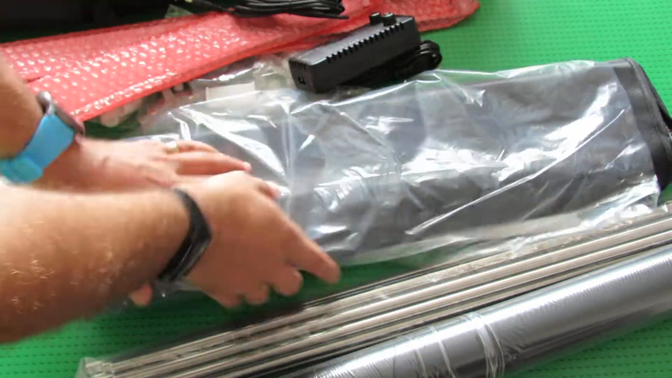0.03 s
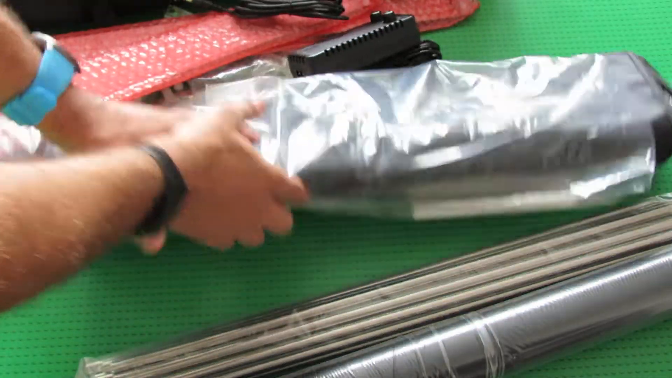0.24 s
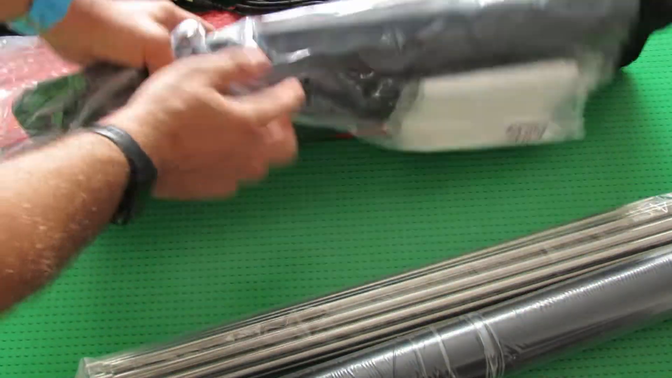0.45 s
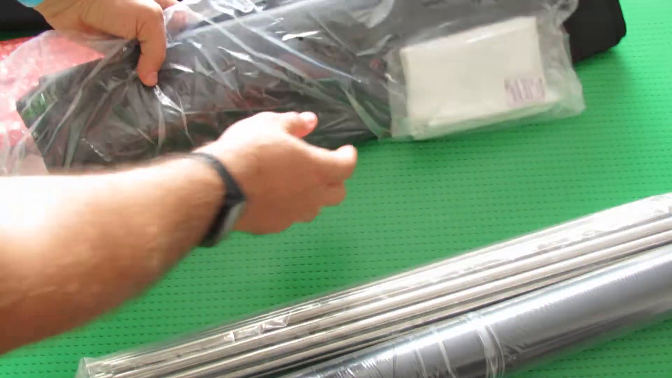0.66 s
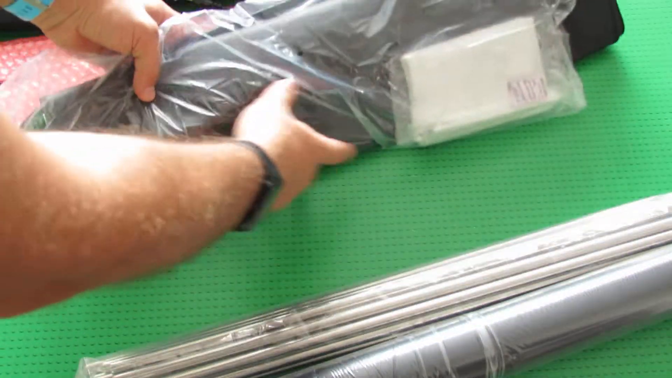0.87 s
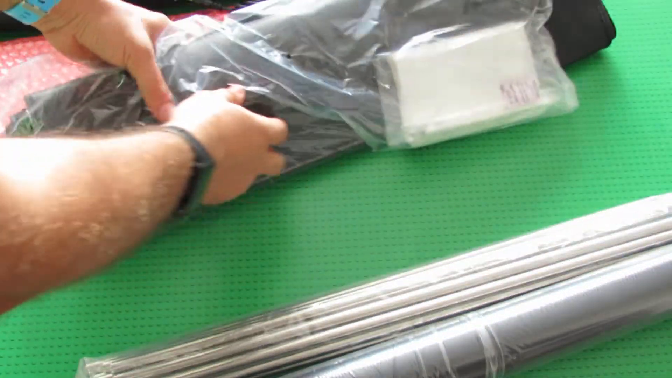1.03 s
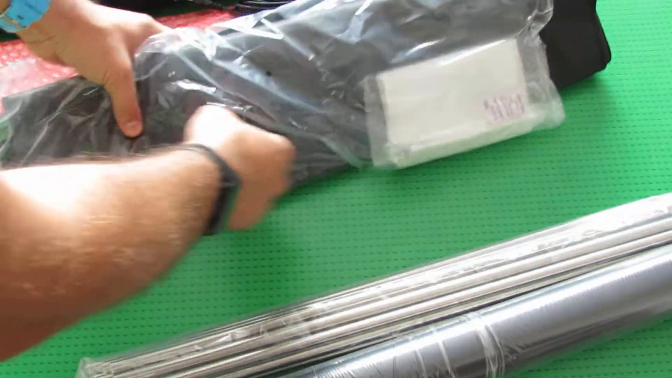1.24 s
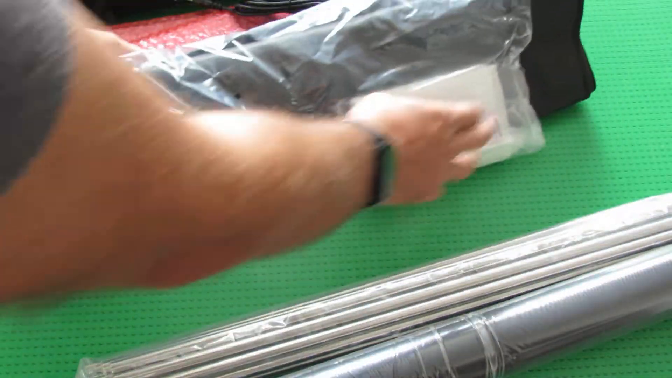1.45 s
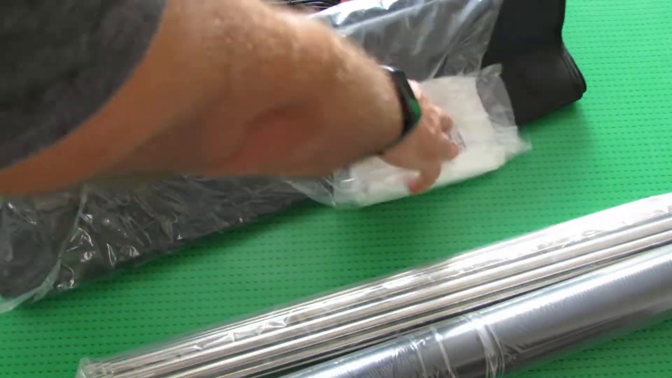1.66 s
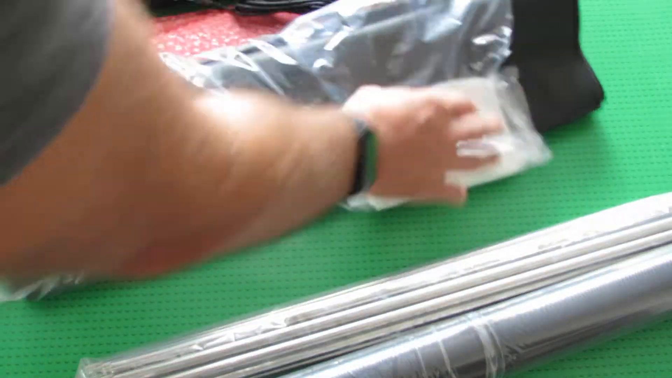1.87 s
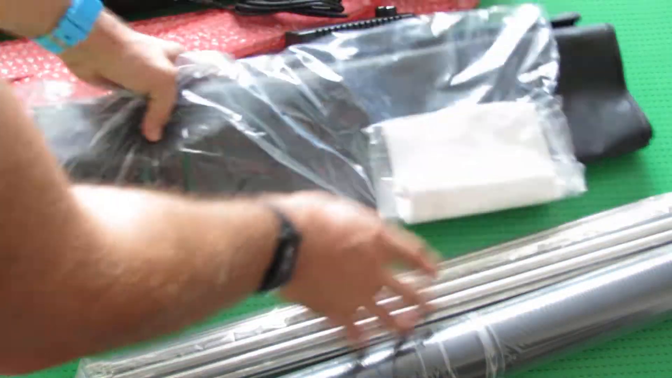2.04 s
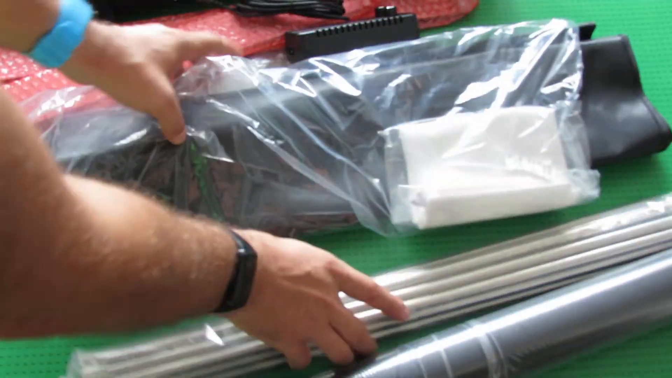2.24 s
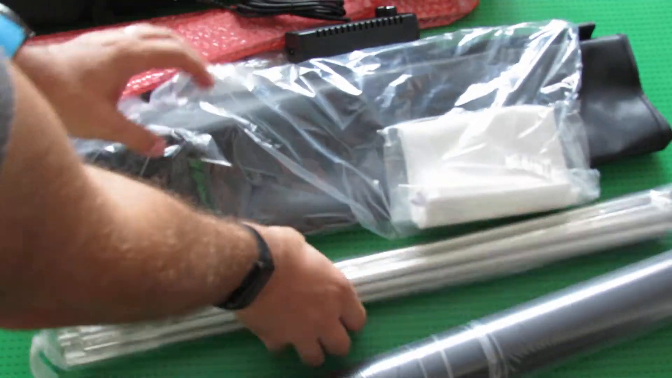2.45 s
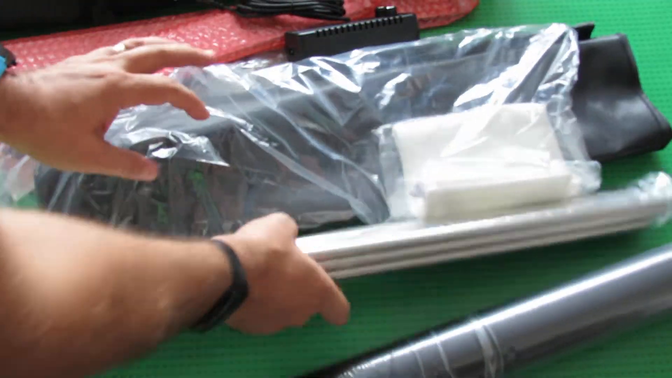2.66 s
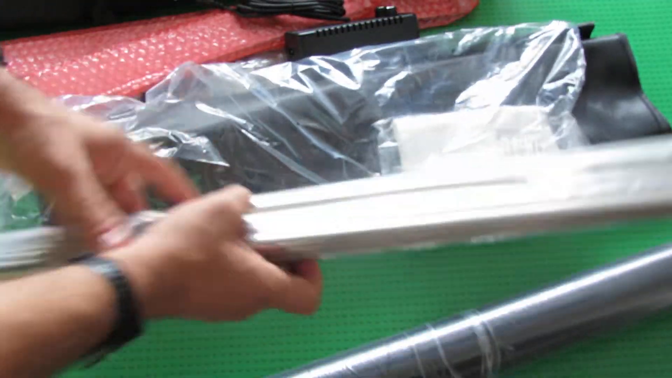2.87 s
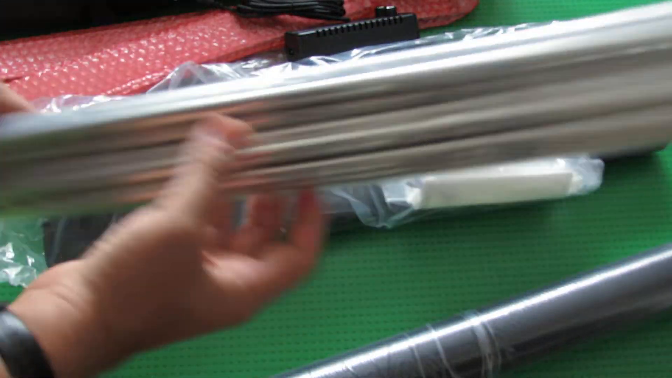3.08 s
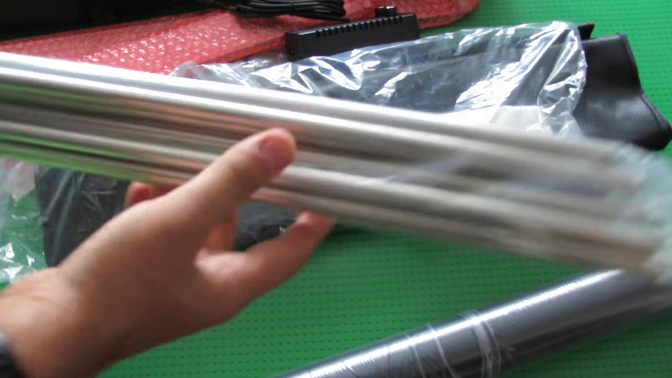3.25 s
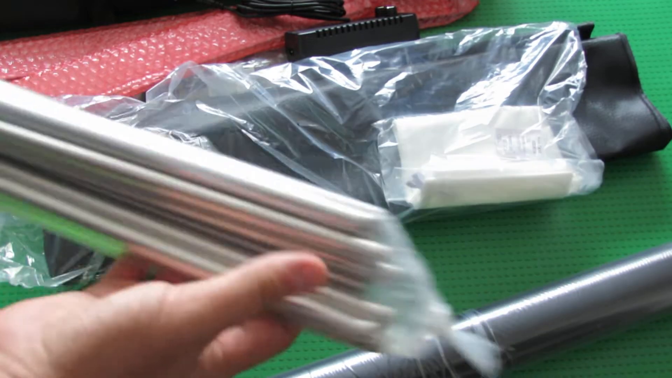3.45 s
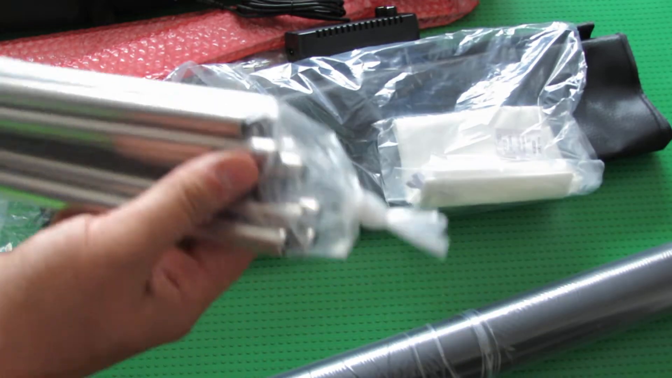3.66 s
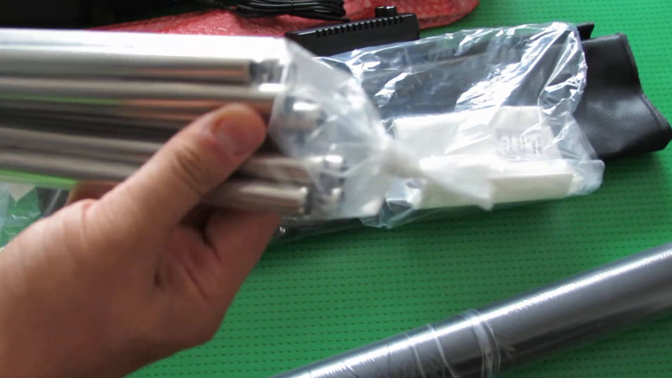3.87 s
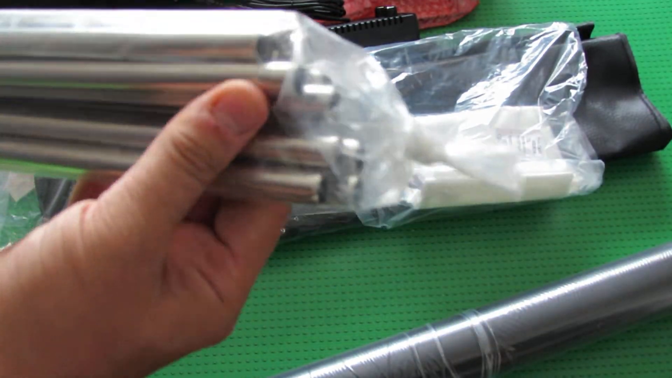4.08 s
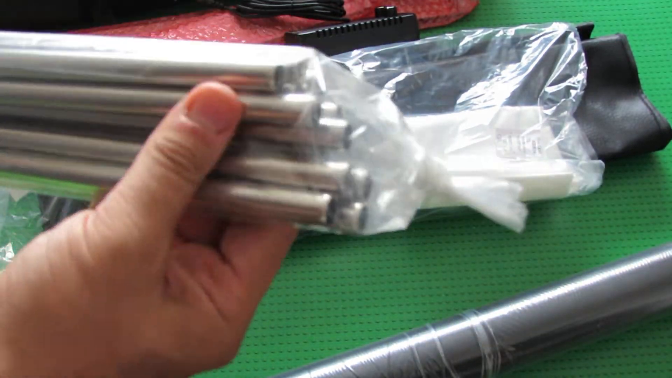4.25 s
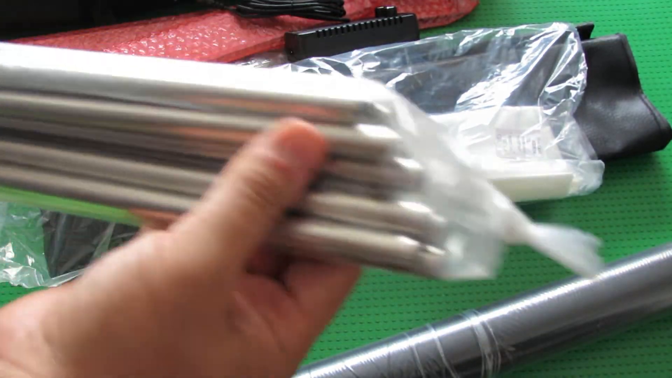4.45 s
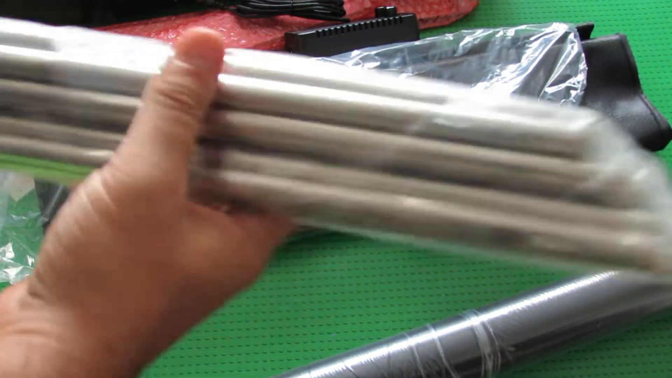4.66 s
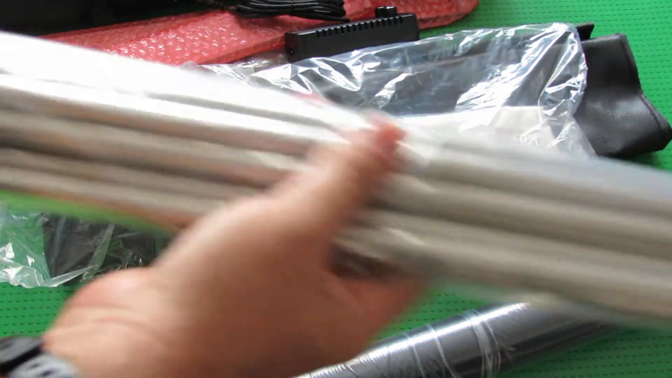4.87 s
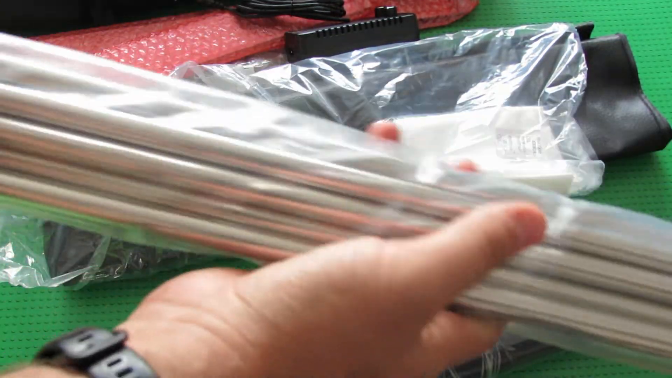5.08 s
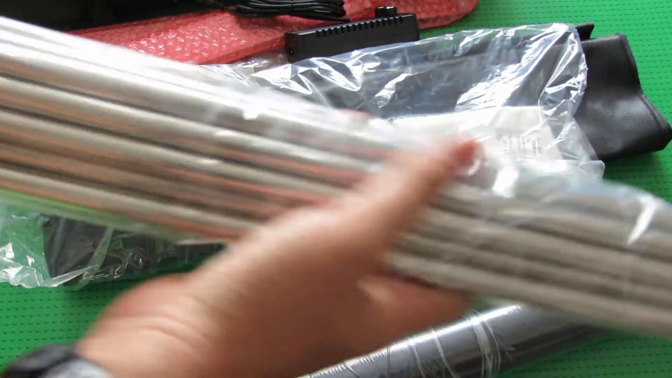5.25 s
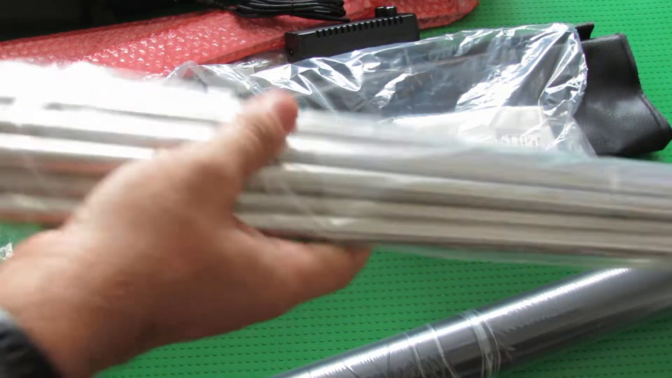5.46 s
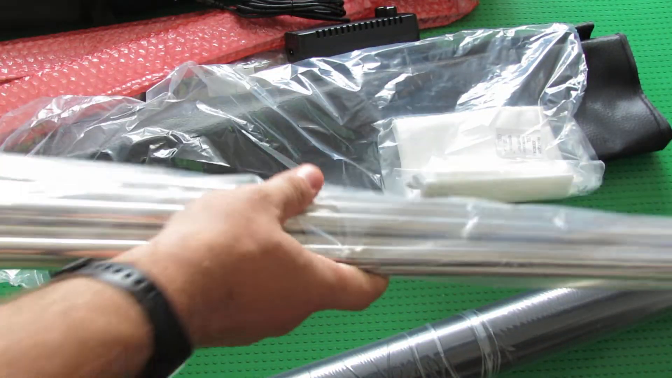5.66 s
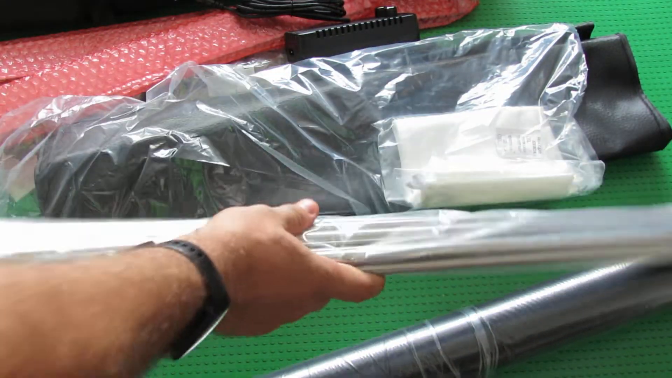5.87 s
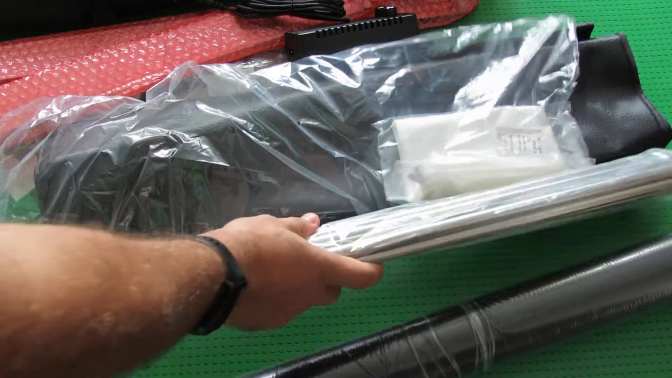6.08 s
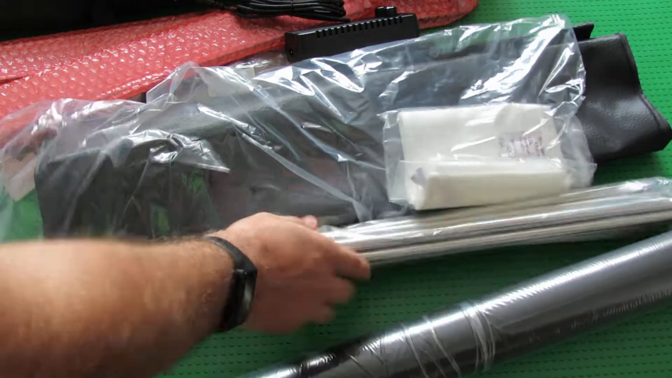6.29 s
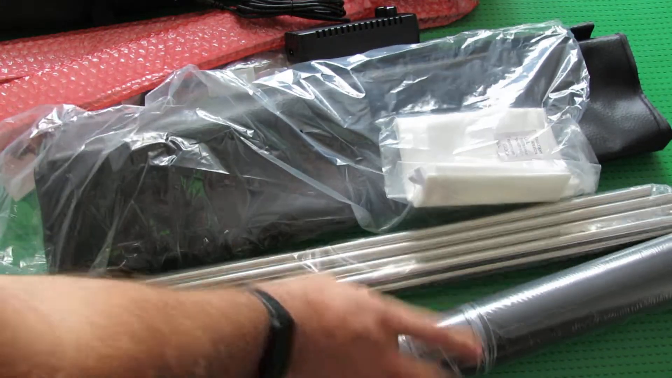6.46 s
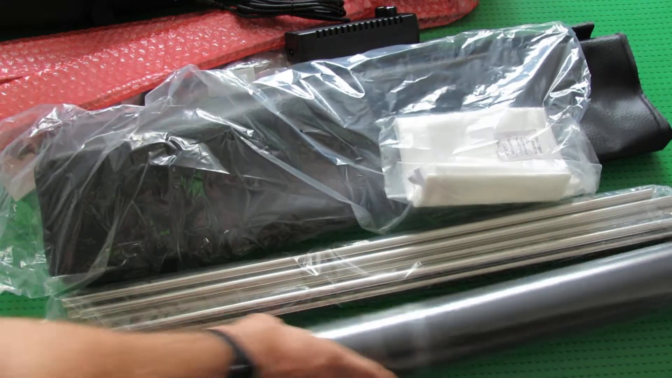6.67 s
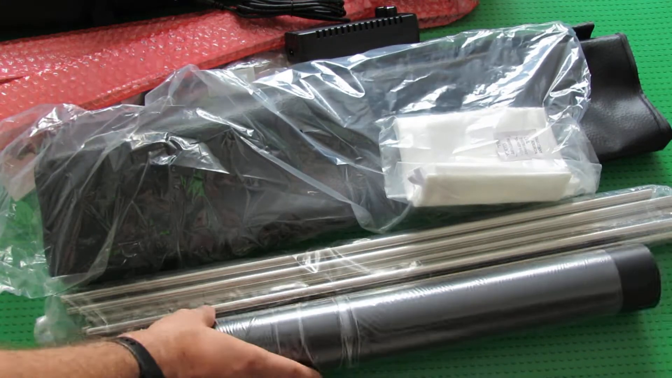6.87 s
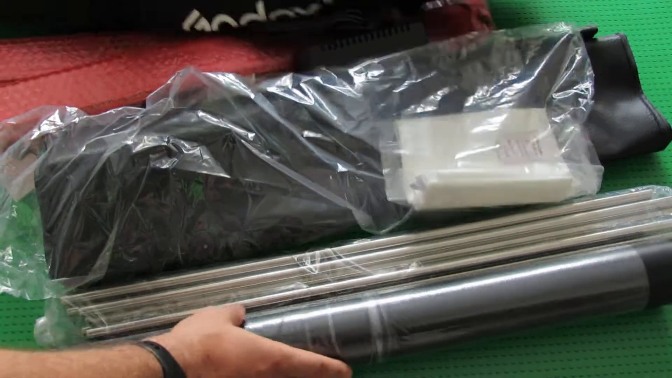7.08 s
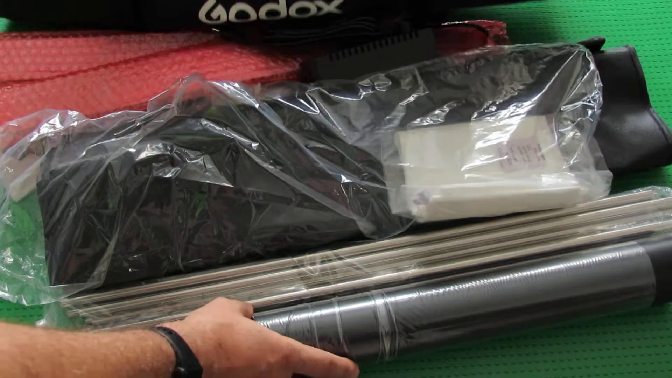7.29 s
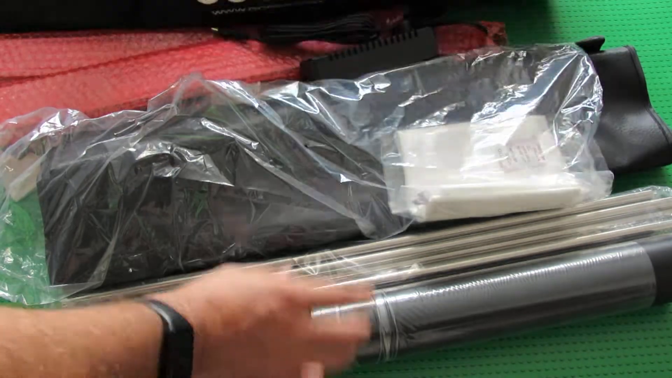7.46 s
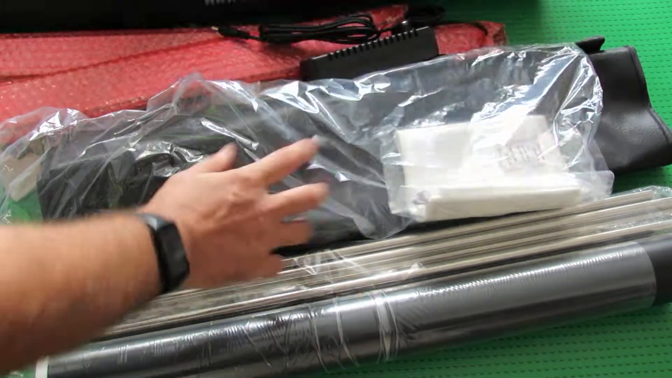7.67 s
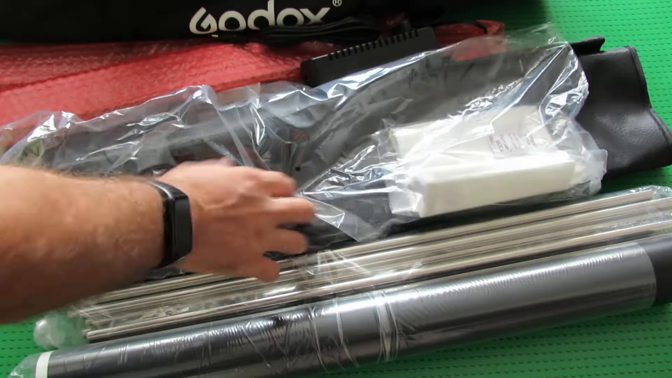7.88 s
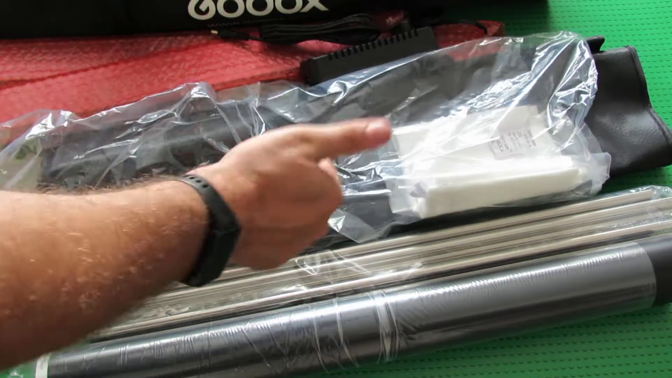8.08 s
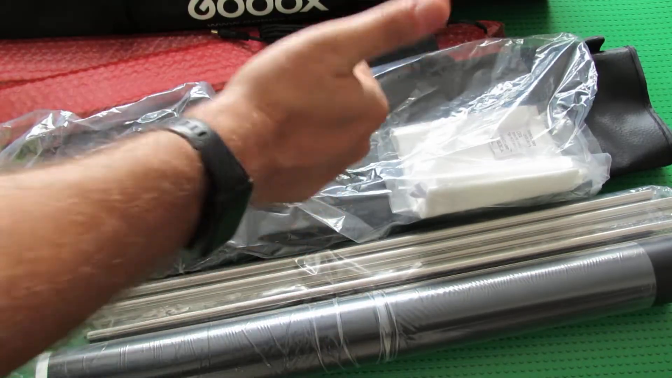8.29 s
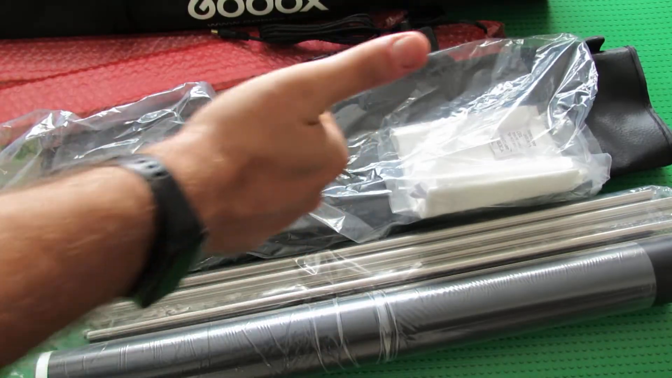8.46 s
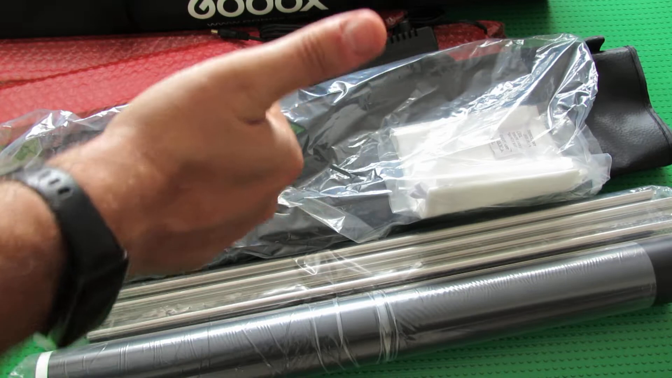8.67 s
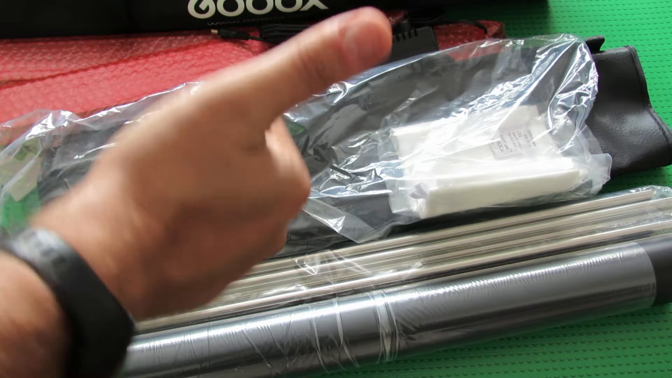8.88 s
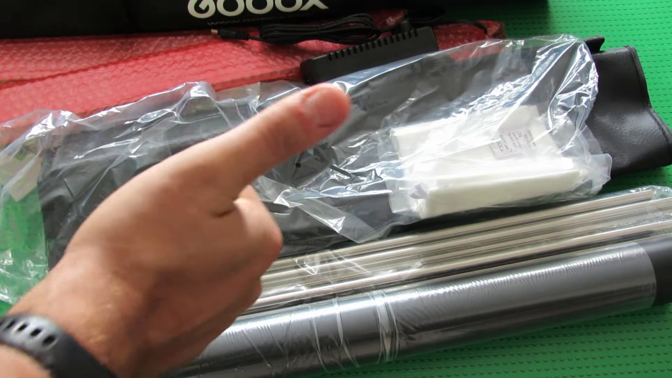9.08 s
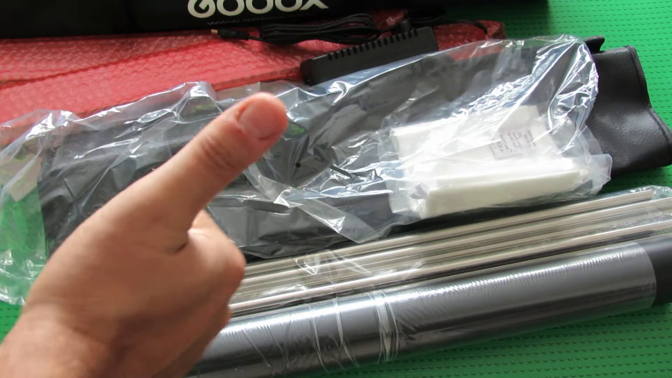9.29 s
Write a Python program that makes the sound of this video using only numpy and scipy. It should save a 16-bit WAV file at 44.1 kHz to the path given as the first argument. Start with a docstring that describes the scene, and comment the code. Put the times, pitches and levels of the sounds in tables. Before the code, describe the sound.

Plastic bags crackle and rustle sharply under busy hands, then a wrapped bundle of thin metal poles rattles brightly before settling into near quiet.

```python
"""Quiet room, floor mat: hands shift plastic bags and handle a wrapped bundle of thin metal poles.
Film crackle is random snaps over fine noise; crushed handfuls swell it and creases pop as noise bursts.
Poles are clusters of resonances driven by the film while the bundle is held; dull noise is rubbing and loads,
damped sines are knocks. Behind lie a wavering three-tone hum, a deep rumble and coloured air noise.
A decaying noise tail adds the room."""
import sys
import numpy as np
from scipy import signal
from scipy.fft import rfft, irfft
from scipy.io import wavfile
from scipy.ndimage import uniform_filter1d

SR = 44100
rng = np.random.default_rng(int(sys.argv[2]) if len(sys.argv) > 2 else 0)


def materialize(psi):
    """Save the field psi as 16-bit PCM at rate SR to the path in sys.argv[1].

    A 1-D psi becomes a single channel; in a 2-D psi each row is a channel.
    """
    bounded = np.clip(np.atleast_2d(psi).T, -1, 1)
    quanta = np.round(bounded * 32767).astype(np.int16)
    wavfile.write(sys.argv[1], SR, quanta)


N = 411453


def from_db(db):
    """Decibels to amplitude gain."""
    return 10 ** (np.asarray(db) / 20)


def rms_one(x):
    """Scale to rms 1."""
    return x / np.sqrt(np.mean(x ** 2) + 1e-20)


def in_time(rows):
    """Columns of a curve table, interpolated to one value a sample."""
    s, *columns = np.transpose(rows)
    t = np.arange(N) / SR
    return [np.interp(t, s, column) for column in columns]


def drift(rate_hz):
    """Slow random curve of rms 1: noise through a two-pole low-pass."""
    r = np.exp(-2 * np.pi * rate_hz / SR)
    noise = rng.standard_normal(N + SR)
    return rms_one(signal.lfilter([1], [1, -2 * r, r * r], noise)[SR:])   # first second: filter run-in


def stereo_noise(shared, own):
    """White noise, partly common to both channels."""
    noise = rng.standard_normal((2, N))
    noise[1] = shared * noise[0] + own * noise[1]
    return noise


def colour(x, spectrum):
    """Causal (minimum-phase) filter that follows a spectrum table."""
    hz, db = np.transpose(spectrum)
    grid_hz = np.maximum(np.fft.rfftfreq(8192, 1 / SR), 1)
    log_gain = np.interp(np.log(grid_hz), np.log(hz), db) * np.log(10) / 20
    # fold the cepstrum onto positive time: minimum phase
    cepstrum = irfft(log_gain)
    cepstrum[1:4096] *= 2
    cepstrum[4097:] = 0
    response = irfft(np.exp(rfft(cepstrum)))
    return signal.fftconvolve(x, response[None, :4096], axes=1)[:, :N]


def resonance(x, hz, width_hz):
    """Two-pole peak with gain 1 on top."""
    r = np.exp(-np.pi * width_hz / SR)
    zeros = [(1 - r * r) / 2, 0, (r * r - 1) / 2]
    poles_hz = [1, -2 * r * np.cos(2 * np.pi * hz / SR), r * r]
    return signal.lfilter(zeros, poles_hz, x + 1e-18)


def band(x, low_hz, high_hz):
    """Butterworth band-pass."""
    return signal.sosfilt(signal.butter(2, [low_hz, high_hz], "band", fs=SR, output="sos"), x)


def low_pass(x, order, hz):
    """Butterworth low-pass."""
    return signal.sosfilt(signal.butter(order, hz, fs=SR, output="sos"), x)


# machine tone and overtones: f/Hz, relative level/dB
HUM_TONES = [(153, -4), (306, -13.5), (459, -17)]
# background curve: t/s, nominal tone level/dB, rumble level/dB
HUM_CURVE = [(0, -56.5, -49), (1.0, -53, -50.5), (2.34, -45.5, -46.5), (2.57, -68.5, -62), (2.91, -73, -67),
             (3.95, -54.5, -55.5), (5.14, -62, -60), (6.26, -56.5, -56.5), (6.68, -80.5, -69.5),
             (6.91, -62.5, -65), (9.33, -53, -51.5)]
HUM_WAVER = 0.015   # pitch spread, rms share


def hum():
    """A machine tone with two overtones wavers in pitch and level over a deep, mostly antiphase rumble."""
    tone_db, rumble_db = in_time(HUM_CURVE)
    turns = np.cumsum(1 + HUM_WAVER * drift(1.5)) / SR
    tone = sum(from_db(db + 1.8 * drift(5)) * np.sin(2 * np.pi * hz * turns) for hz, db in HUM_TONES)
    rumble = rms_one(band(stereo_noise(shared=-0.8, own=0.58), 28, 97))
    tone_sides = from_db([[2.5], [-2.5]]) * tone
    return np.sqrt(2) * from_db(tone_db) * tone_sides + from_db(rumble_db) * rumble


# air noise spectrum: f/Hz, relative level/dB per Hz
AIR_SPECTRUM = [(41, -45), (70, -3.5), (103, -13), (159, -4.5), (204, -5), (412, -8), (462, -17),
                (517, -10.5), (6300, -25.5), (14600, -35), (16000, -48.5)]
AIR_RMS_DB = -58.5


def air():
    """Steady coloured noise of the room, independent in each channel."""
    return from_db(AIR_RMS_DB) * rms_one(colour(rng.standard_normal((2, N)), AIR_SPECTRUM))


# handling between louder events: t/s, nominal steady crackle level/dB, dull rubbing level/dB
HANDLING_CURVE = [(0.0, -35, -40), (0.36, -25, -35), (0.72, -35.5, -45), (1.17, -31.5, -41.5),
                  (1.4, -32.5, -46), (2.26, -28.5, -37.5), (2.49, -28, -47.5), (2.75, -44.5, -57.5),
                  (3.38, -33, -56.5), (3.59, -38.5, -49), (3.9, -38.5, -51), (4.44, -41.5, -50),
                  (4.73, -28, -42), (5.43, -39, -55.5), (5.59, -46, -55.5), (6.11, -45.5, -64),
                  (6.31, -35.5, -47.5), (6.42, -36.5, -62), (6.57, -57.5, -95), (6.91, -57.5, -69),
                  (7.09, -51, -58.5), (7.95, -47, -52.5), (8.16, -64.5, -62.5), (9.33, -69.5, -66.5)]


def handling():
    """Gains of steady crackle and rubbing as the hands move."""
    film_db, rub_db = in_time(HANDLING_CURVE)
    return from_db(film_db), from_db(rub_db)


# film spectrum: f/Hz, relative level/dB per Hz
FILM_SPECTRUM = [(290, -35), (500, -14), (933, 0), (1000, -3.5), (1060, -0.5), (1320, -1), (1690, 1),
                 (4400, 1), (7750, -0.5), (11800, -3), (16000, -8)]
SNAPS_PER_S = 900   # median
SIZE_SPREAD_DB, CLUMP_DB = 2.5, 4.5


def crackle(spot_pan_db, ring_db, count=8):
    """Facets of film snap in clumps; each spot on the bag has its own place, delay and brief ring."""
    size_db = SIZE_SPREAD_DB * np.minimum(rng.exponential(1, N), 4.5) + CLUMP_DB * drift(52)
    sizes = from_db(size_db) * rng.choice([-1, 1], N)
    born = rng.random(N) < SNAPS_PER_S * from_db(3 * drift(15)) / SR
    spot = rng.integers(0, count, N)
    out = np.zeros((2, N))
    for k, hz in enumerate(np.geomspace(1300, 12500, count)):
        snaps = sizes * born * (spot == k)
        snaps = snaps + from_db(ring_db) * resonance(snaps, hz, 0.31 * hz)
        side_db = spot_pan_db * (-1) ** k
        delayed = np.roll(snaps, k % 3)   # 0-2 samples
        out += [from_db(side_db) * snaps, from_db(-side_db) * delayed]
    return rms_one(colour(out, FILM_SPECTRUM))


def fine_crackle():
    """Snaps too dense to tell apart: film-coloured noise, partly shared one sample apart."""
    shared = rng.standard_normal(N)
    noise = rng.standard_normal((2, N)) + 1.4 * np.array([shared, np.roll(shared, 1)])
    return rms_one(colour(noise, FILM_SPECTRUM))


# rubbing spectrum: f/Hz, relative level/dB per Hz
RUB_SPECTRUM = [(55, -40.5), (90, -10), (150, -8), (230, -3.5), (275, 3), (320, -2.5), (550, -2.5),
                (750, -4.5), (1200, -11), (3000, -52.5)]


def rubbing():
    """Bags and loads drag and bump on the mat: lumpy dull noise."""
    noise = stereo_noise(shared=0.73, own=0.5)
    return rms_one(colour(noise, RUB_SPECTRUM) * from_db(2.0 * drift(17)))


# level of the film's treble: t/s, gain/dB
TREBLE_CURVE = [(0, 0.5), (2.25, -2.5), (2.4, 3.5), (3.3, 0), (4.2, -19), (4.5, -3), (6.1, -5), (6.4, 3.5),
                (6.9, -0.5), (9.33, -8)]


def film_treble(film):
    """Split at 3.5 kHz with one pole; the upper part follows the treble curve."""
    dull = low_pass(film, 1, 3500)
    treble_db, = in_time(TREBLE_CURVE)
    return dull + from_db(treble_db) * (film - dull)


# where the hands work: t/s, left minus right level/dB
PLACE_CURVE = [(0.0, 1.5), (2.86, 0.5), (3.38, 2.5), (5.69, 1.5), (5.87, 0), (7.17, 1.5), (9.33, 2)]


def place(near):
    """Level difference between channels follows the hands."""
    pan_db, = in_time(PLACE_CURVE)
    return near * from_db([pan_db / 2, -pan_db / 2])


ROOM_T60_S, ROOM_DB = 0.48, -12.5


def room(x):
    """Diffuse reflections: a dying noise tail a side, whose treble dies first."""
    age = np.arange(SR // 2) / SR
    noise = rng.standard_normal((2, len(age))) * (age > .003)
    low = low_pass(noise, 2, 6000)
    low_tail = low * from_db(-60 * age / ROOM_T60_S)
    high_tail = (noise - low) * from_db(-60 * age / (0.26 * ROOM_T60_S))
    tail = low_tail + high_tail
    tail = tail / np.sqrt(np.sum(tail ** 2, axis=1, keepdims=True))
    return from_db(ROOM_DB) * signal.fftconvolve(x, tail, axes=1)[:, :N]


# film crushed by the handful, loads dropped:
# t/s, rise/s (min .001), t60/s (min .02), nominal crackle level/dB, dull push level/dB
CRUNCH_EVENTS = [(0.029, 0.025, 0.46, -24, -49.5), (0.87, 0.0024, 0.14, -28, -40),
                 (.945, 0.015, 0.058, -24.5, -42), (1.566, .016, 0.14, -13.5, -29.5),
                 (2.039, 0.032, 0.2, -24, -39), (2.195, 0.0035, 0.025, -26.5, -43),
                 (2.416, 0.0077, 0.23, -20, -47), (2.455, 0.016, 0.18, -23, -75),
                 (2.515, 0.027, 0.12, -22.5, -56.5), (2.669, 0.0064, 0.094, -28.5, -41.5),
                 (2.775, 0.0012, 0.04, -38, -57), (2.952, 0.025, 0.098, -19, -43),
                 (3.274, .002, 0.14, -41.5, -69), (3.43, 0.0048, 0.09, -24, -51),
                 (3.549, 0.0059, 0.075, -32, -44.5), (4.498, 0.0034, 0.092, -24, -49),
                 (4.612, 0.011, 0.065, -18, -32.5), (4.904, 0.018, 0.031, -20, -47),
                 (4.949, 0.0034, 0.092, -18.5, -69), (5.305, 0.017, 0.14, -25.5, -54),
                 (5.407, 0.0054, 0.19, -25, -41.5), (5.468, 0.02, .1, -28.5, -44),
                 (5.81, .004, 0.16, -23.5, -40.5), (6.07, .05, .1, -43, -55),
                 (6.15, .002, 0.18, -20.5, -35.5), (6.258, .004, 0.2, -33.5, -46.5),
                 (6.309, 0.028, 0.29, -15.5, -36.5), (6.875, 0.13, 0.41, -64, -42.5),
                 (6.93, 0.11, 1, -43, -53), (7.306, 0.06, 0.075, -50.5, -59),
                 (7.678, 0.034, 0.38, -26.5, -41), (8.45, 0.022, 0.47, -57, -75)]
CRUNCH_HOLD_S = 0.016


def crunches():
    """Gains for crackle and push: a rise, a plateau, a decay."""
    out = np.zeros((2, N))
    age = np.arange(SR // 2) / SR
    for s, rise_s, t60_s, crackle_db, push_db in CRUNCH_EVENTS:
        i = round(s * SR)
        rise = np.minimum(age / max(rise_s, .001), 1)
        fall_age = np.maximum(age - rise_s - CRUNCH_HOLD_S, 0)
        shape = rise * from_db(-60 * fall_age / max(t60_s, .02))
        out[:, i:i + len(age)] += from_db([[crackle_db], [push_db]]) * shape
    return out


# creases that pop, poles that tick, before treble and wrap filters:
# t/s, crack peak level/dB, ring peak level/dB, ring f/Hz
POP_EVENTS = [(0.0442, -8, -14, 1600), (0.0947, -10, -14, 2210), (0.121, -11, -21, 1550),
              (0.2905, -10, -13, 2394), (0.3062, -15, -23, 2555), (0.597, -13, -25, 964),
              (0.6387, -18, -21, 2710), (0.7805, -9, -31, 2840), (0.8702, -19, -12, 2050),
              (0.9432, -6.5, -27, 2810), (0.9904, -3, -40, 2273), (1.1069, -14.5, -29, 2510),
              (1.275, -12, -31, 2430), (1.2943, -11.5, -35, 2650), (1.3205, -8, -23, 860),
              (1.511, -24.5, -24, 2090), (1.5708, -8, -9, 2000), (1.777, -7.5, -24, 1050),
              (1.7936, -8.5, -17.5, 2700), (1.8528, -21, -14.5, 1760), (1.9645, -13, -35, 2115),
              (2.2009, -3, -8.5, 1390), (2.2717, -21, -28.5, 1587), (2.3535, -19, -10.5, 2360),
              (2.373, -2.5, -8.5, 2010), (2.4202, -9, -10.5, 2420), (2.6811, -15, -15.5, 2825),
              (2.7796, -15, -15.5, 1680), (2.9385, -27, -21, 2700), (2.9773, -4.5, -9.5, 2210),
              (3.0432, -14, -19, 2690), (3.085, -15, -21, 2830), (3.274, -23, -20, 2260),
              (3.3498, -20.5, -19.5, 2830), (3.4372, -4, -41, 2810), (3.512, -25, -21, 2900),
              (3.555, -8, -27, 2470), (3.6702, -9, -18.5, 1460), (3.7312, -19.5, -21.5, 1060),
              (3.7962, -13, -21.5, 1080), (3.8563, -17, -32, 2610), (3.9185, -23, -35, 1090),
              (4.0008, -11.5, -22.5, 1030), (4.034, -26, -45, 1030), (4.0966, -17, -25, 2700),
              (4.146, -11.5, -14.5, 818), (4.2085, -21, -21, 1900), (4.2353, -16.5, -41.5, 1820),
              (4.3754, 1.5, -11.5, 1810), (4.504, -9, -10.5, 2650), (4.5715, -12.5, -14, 3040),
              (4.5938, -8, -15, 2900), (4.6314, 0, -16, 2920), (4.6738, -5, -16, 2930),
              (4.6932, -16, -11, 2750), (4.732, -9, -37, 2030), (4.8, -9.5, -24, 2230),
              (4.839, -3.5, -11.5, 1870), (4.9192, -26, -12, 3000), (4.9587, -2, -8, 2040),
              (5.039, -22, -41, 1990), (5.2107, -30, -38, 1160), (5.2951, -6.5, -37, 1960),
              (5.3198, -12, -21, 1800), (5.406, -13, -27, 2800), (5.42, -8.5, -14, 2730),
              (5.4888, -10, -35, 2730), (5.5812, -17, -41, 2585), (5.7002, -27, -51, 2230),
              (5.8098, -8, -17, 2820), (5.8309, -4, -1, 2500), (5.8731, -7.5, -30.5, 2730),
              (6.0883, -23, -33.5, 1520), (6.1534, -15, -8, 1060), (6.2637, -14, -16, 2700),
              (6.3245, -11, -20, 2707), (6.5828, -27.5, -30, 2650), (7.2812, -27.5, -33, 1590),
              (7.3436, -29, -26.5, 1510), (7.6848, -20, -26, 1320), (7.7124, -9, -22, 1140),
              (7.7972, -13, -25, 2710), (8.0476, -26.5, -41, 2930), (8.1446, -29, -60, 939)]
POP_T60_S, POP_RISE_S = 0.013, 0.00092


def pops():
    """A quick crack of treble noise, of its own colour each time, and a brief ring at the pitch of the fold."""
    out = np.zeros((2, N))
    spray = stereo_noise(shared=0.67, own=0.5)
    tints = rng.uniform(0, 1, len(POP_EVENTS))
    for (s, crack_db, ring_db, hz), tint in zip(POP_EVENTS, tints):
        i = round(s * SR)
        age = np.arange(min(SR // 8, N - i)) / SR
        shape = from_db(-60 * age / POP_T60_S) * np.minimum(age / POP_RISE_S, 1)
        tail = from_db(-17.5 - 60 * age / (7.8 * POP_T60_S))   # the film settles
        burst = (shape + tail) * spray[:, i:i + len(age)]
        crack = band(burst, 2200 + 2500 * tint, 10000 + 5000 * tint)
        ring = resonance(burst, hz, 0.3 * hz)
        out[:, i:i + len(age)] += from_db(crack_db) * crack / np.abs(crack).max()
        out[:, i:i + len(age)] += from_db(ring_db) * ring / np.abs(ring).max()
    return out


# hands hold still: from t/s, to t/s
PAUSE_SPANS = [(1.37, 1.61), (2.81, 2.86), (3.17, 3.35), (3.93, 4.02), (5.70, 5.81), (5.93, 6.22),
               (7.56, 7.68)]
PAUSE_DB, SETTLE_S = -11.5, 0.02


def pauses():
    """Gain of the steady crackle: sinks while the hands rest, returns at once."""
    t = np.arange(N) / SR
    depth = sum(np.clip((t - start) / SETTLE_S, 0, 1) * (t < end) for start, end in PAUSE_SPANS)
    return from_db(PAUSE_DB * depth)


# knocks on the mat and in the hand: t/s, starting level/dB, f/Hz
KNOCK_EVENTS = [(2.339, -24.5, 272), (3.374, -37, 516), (3.842, -29, 1150), (4.0, -26, 1020),
                (4.034, -28.5, 1040), (4.085, -26, 1060), (4.146, -24, 368), (4.285, -30.5, 786),
                (6.99, -33, 273), (7.389, -46, 273), (7.527, -35.5, 444), (7.963, -42, 147.7)]


def knocks():
    """A soft blow: a damped low ring, down 60 dB in 22 cycles."""
    out = np.zeros(N)
    age = np.arange(SR // 8) / SR
    for s, db, hz in KNOCK_EVENTS:
        i = round(s * SR)
        out[i:i + len(age)] += from_db(db - 60 * age * hz / 22.0) * np.sin(2 * np.pi * hz * age)
    return out


# bundle lifted, then lying still again: from t/s, to t/s
HELD_SPAN = (2.34, 6.75)


def bundle_held():
    """1 while the bundle is in hand, else 0; edges smoothed over 50 ms."""
    t = np.arange(N) / SR
    inside = np.abs(t - np.mean(HELD_SPAN)) < np.ptp(HELD_SPAN) / 2
    return uniform_filter1d(1. * inside, size=SR // 20)


# tight film round the poles: f/Hz, gain/dB
WRAP_SPECTRUM = [(500, -4), (1200, -1), (2800, 1), (4450, -7), (5600, 4), (9000, 0), (12000, -3),
                 (16000, -7)]


def wrapped(film, held):
    """Film takes the colour of the tight wrap while the bundle is held."""
    return (1 - held) * film + held * colour(film, WRAP_SPECTRUM)


# how freely the poles ring in the grip: t/s, drive gain/dB
GRIP_CURVE = [(2.34, -3), (3.2, 2), (4.3, -2.5), (5.7, -1), (6.25, 0.5), (6.6, 5)]
POLE_CRUSH_DB, POLE_FILM_DB = -5.5, -9   # drive from crushing, from all film sound


def pole_drive(crush, film, held):
    """Crushing rattles the poles together; all film sound stirs them too."""
    loose_db, = in_time(GRIP_CURVE)
    return held * from_db(loose_db) * (from_db(POLE_CRUSH_DB) * crush + from_db(POLE_FILM_DB) * film)


# pole resonances: f/Hz, cluster width scale/Hz, drive level/dB
POLE_MODES = [(1060, 36, -17), (1760, 80, -16.5), (2673, 130, -4), (3687, 130, 4.5), (5350, 410, -11),
              (6130, 150, -18.5), (7330, 130, -6.5), (7990, 60, -8), (8850, 200, 4), (10380, 220, -0.5),
              (12000, 120, -9.5), (13900, 150, -17)]
SHIFT_DB, SHIFT_HZ = 5, 4   # rms swing and rate of the drive to each mode


def poles(x):
    """Several alike poles: each resonance is a cluster of close modes, struck more or less as the bundle shifts."""
    out = np.zeros_like(x)
    shifting = from_db(SHIFT_DB * drift(SHIFT_HZ))
    for hz, width_hz, db in POLE_MODES:
        for offset in (-.7, -0.12, 0.41, 0.74, .75):
            drive = from_db(db) * np.roll(shifting, rng.integers(N)) * x
            out += resonance(drive, hz + offset * width_hz, 26)
    return out


def scene():
    """Film, poles, mat, room and hum."""
    film_gain, rub_gain = handling()
    crushed, pushed = crunches()
    fine = fine_crackle()
    snaps = crackle(spot_pan_db=3.0, ring_db=13.0)
    steady = film_gain * pauses() * (1.076 * snaps + 0.64 * fine)
    crush = crushed * (1.01 * fine + 0.24 * snaps)
    film = film_treble(steady + crush + pops())
    held = bundle_held()
    film = wrapped(film, held)
    metal = poles(pole_drive(crush, film, held))
    mat = (rub_gain + pushed) * rubbing()
    near = place(film + metal + mat + knocks())
    return near + room(near) + air() + hum()


CUTOFF_HZ = 15750


def record(dry):
    """Clip at full scale, then cut the top with a steep elliptic low-pass."""
    top_cut = signal.ellip(12, .5, 85, CUTOFF_HZ, fs=SR, output="sos")
    return signal.sosfilt(top_cut, np.clip(dry, -1, 1))


dry = scene()
out = record(dry)
materialize(out)
```